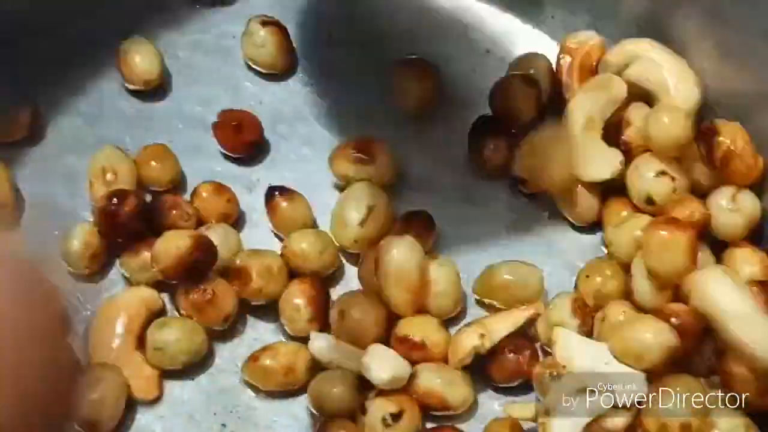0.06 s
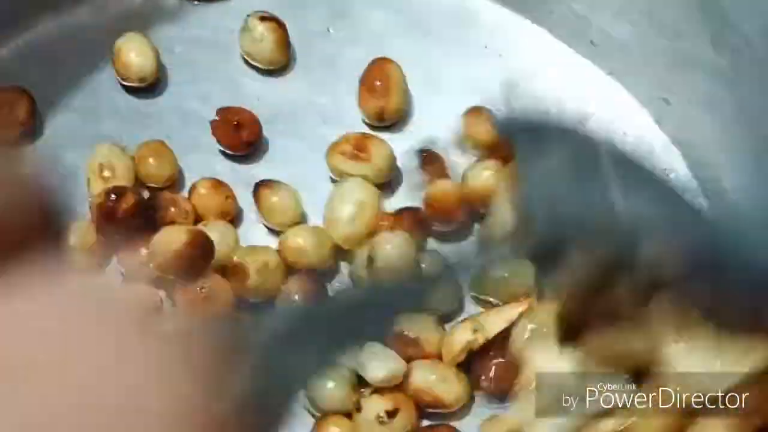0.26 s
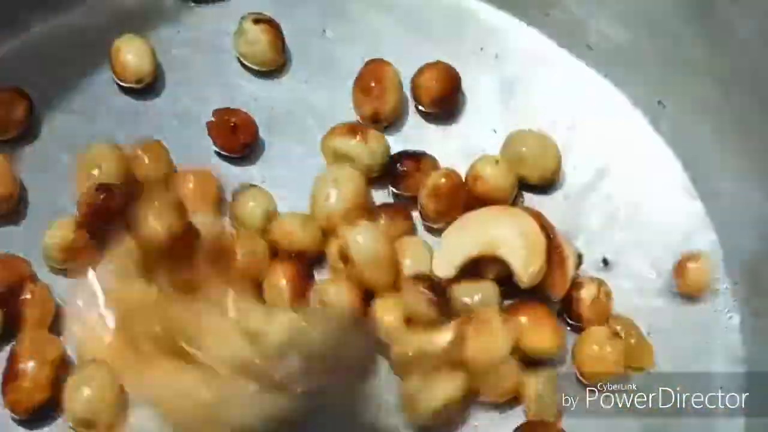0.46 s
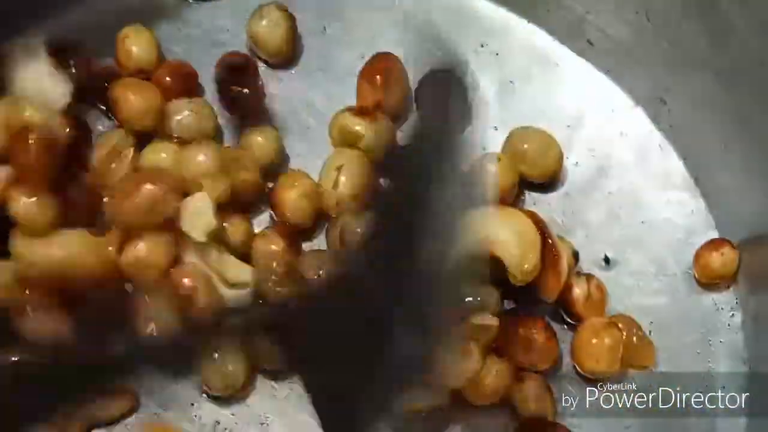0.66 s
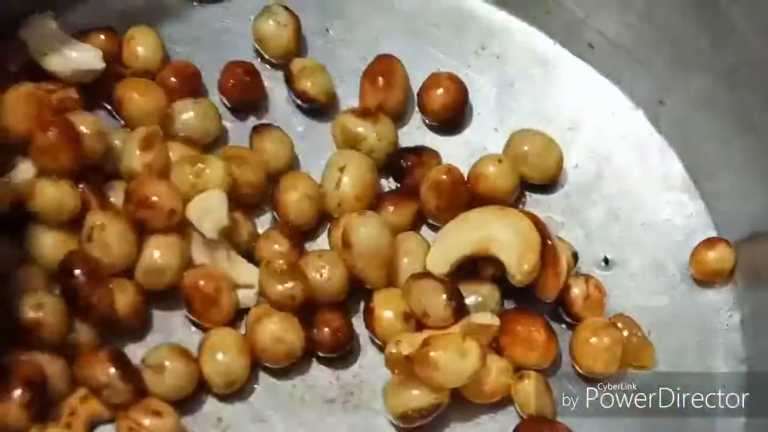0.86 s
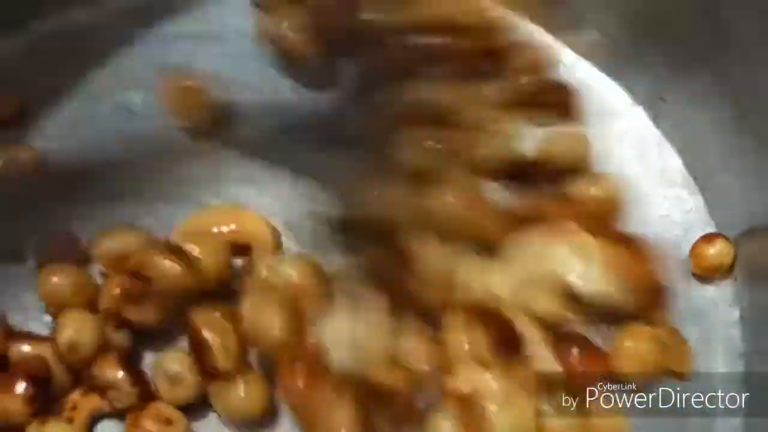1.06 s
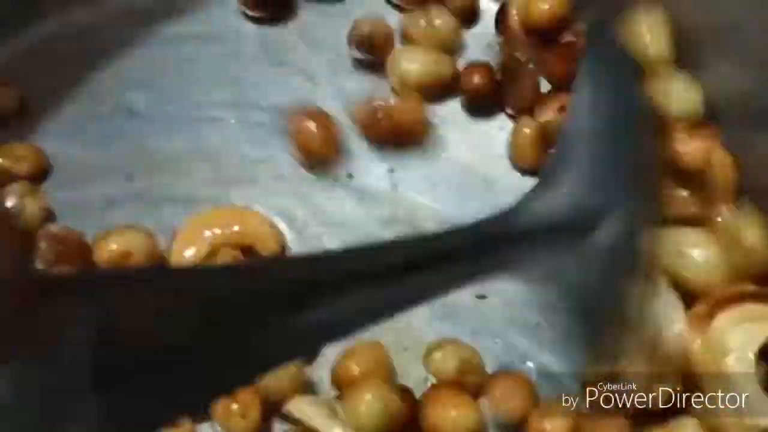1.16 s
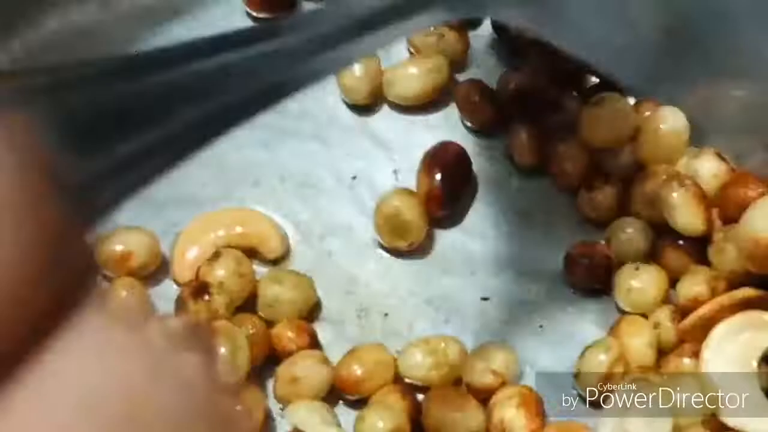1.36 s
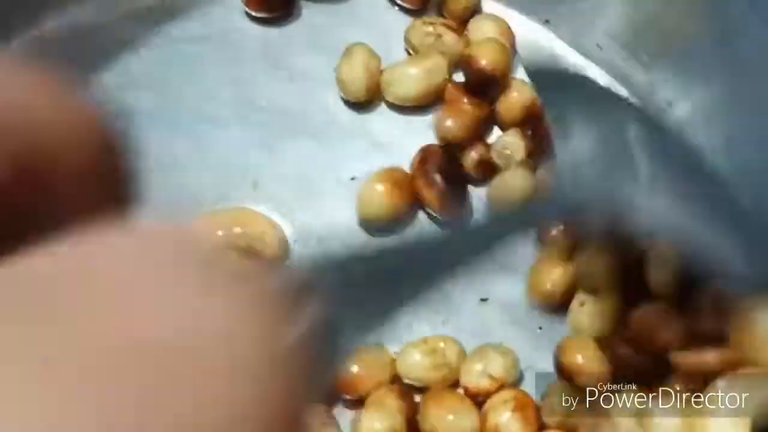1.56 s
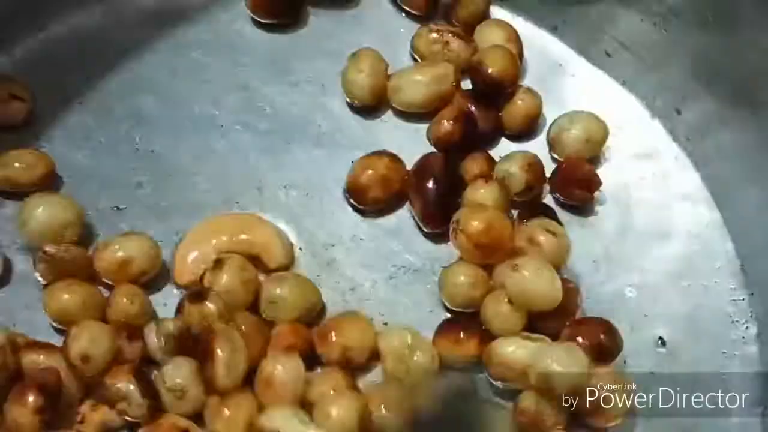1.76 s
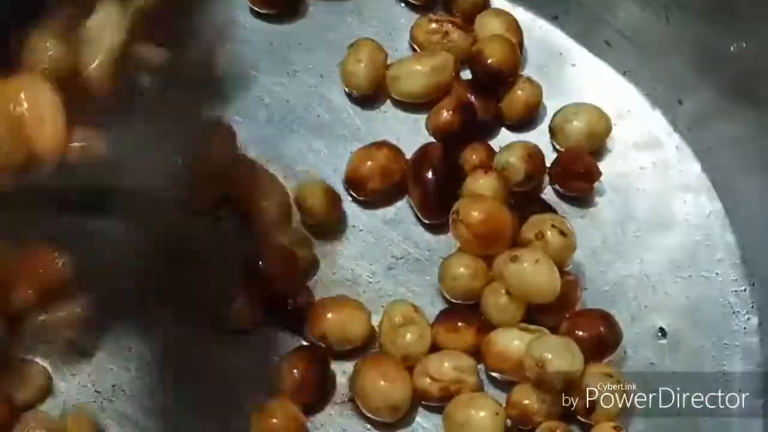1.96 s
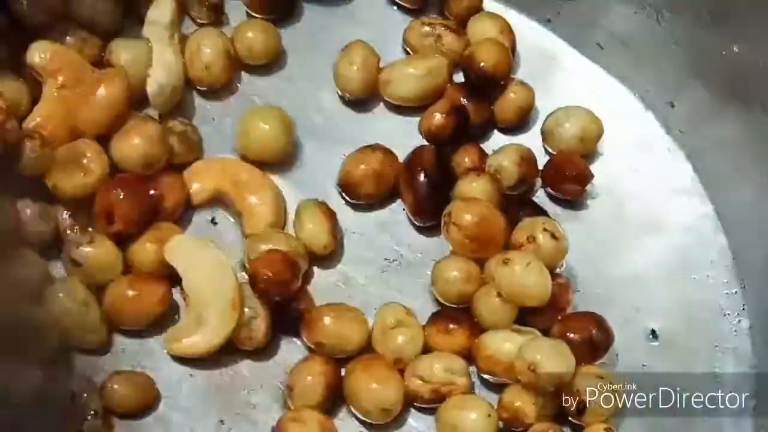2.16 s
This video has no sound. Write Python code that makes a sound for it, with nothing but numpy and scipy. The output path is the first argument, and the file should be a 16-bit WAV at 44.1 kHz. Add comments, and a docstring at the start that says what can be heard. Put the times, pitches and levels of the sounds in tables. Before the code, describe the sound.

A metal spoon stirs nuts in a steel pan, heard close and dry. After faint sizzle and low hum, a strong clank lands near 0.25-0.3 seconds, then knocks and a gritty scrape at 0.4-0.65. A shorter, brighter scrape up the wall comes at 1.1-1.27. Light taps at 1.6 lead to a third scrape with rattling knocks at 1.7-1.97, then a small last brush around 2.05.

```python
"""Three strokes of a metal spoon in a steel pan of nuts, close by: gritty scrapes, with knocks before or during them.
Each contact is a filtered noise burst plus decaying sine modes of spoon and pan, damped by hand and load.
Scrapes drive such responses with dense stick-slip impulses and nut ticks; single nuts add pitched hits.
Hot fat sizzles faintly as coloured random clicks, over a low stove rumble of coloured noise and a hum."""
import sys
import numpy as np
from scipy import signal
from scipy.fft import rfft, irfft
from scipy.io import wavfile
from scipy.ndimage import uniform_filter1d

SR = 44100
rng = np.random.default_rng(int(sys.argv[2]) if len(sys.argv) > 2 else 0)


def master_out(mix):
    """Clip the mix to full scale and print it as 16-bit PCM to the path in sys.argv[1]."""
    frames = np.transpose(np.atleast_2d(mix))
    ceiling = np.clip(frames, -1, 1)
    pcm = np.round(ceiling * 32767).astype(np.int16)
    wavfile.write(sys.argv[1], SR, pcm)


N = 97020
TIME = np.arange(N) / SR
RESPONSE_SIZE = 14400  # samples in the response to one contact
HIT_SPAN_S = 0.02  # opening of a hit over which its level is set
DRAGGED_SPOON_DB = -16.5  # ring of the spoon in scrapes and nut hits


def undb(db):
    """Amplitude gain is ten to the power of decibels over twenty."""
    return 10 ** (np.asarray(db) / 20)


def unit(x):
    """Energy normalisation: the squares sum to 1."""
    return x / np.sqrt(np.sum(x ** 2))


def level(x, db):
    """Root-mean-square normalisation of a full-length sound, in dB re 1."""
    return unit(x) * np.sqrt(N) * undb(db)


def decay(t, t60):
    """Exponential damping: the amplitude falls by 60 dB in t60 seconds."""
    return np.exp(-np.log(1000) * t / t60)


def colour(points, size=4096):
    """Minimum-phase filter taps for (Hz, dB) points, by folding the real cepstrum."""
    hz, db = np.array(sorted(points), float).T
    log_grid = np.log(np.fft.rfftfreq(size, 1 / SR) + 1)
    curve_db = np.interp(log_grid, np.log(hz), db)
    cepstrum = irfft(np.log(undb(curve_db)))
    cepstrum[1:size // 2] *= 2
    cepstrum[size // 2 + 1:] = 0
    return irfft(np.exp(rfft(cepstrum)))[:size // 2]


def shape(x, taps):
    """Linear filtering is convolution with an impulse response."""
    return signal.fftconvolve(x, taps)[:len(x)]


def bands(x):
    """Crossover filtering splits a sound into bass, middle, presence and treble."""
    # crossover frequencies: hz
    band_edges = [1100, 3000, 5000]
    parts = []
    for hz in band_edges:
        low = signal.butter(5, hz, "low", fs=SR, output="sos")
        high = signal.butter(5, hz, "high", fs=SR, output="sos")
        parts.append(signal.sosfilt(low, x))
        x = signal.sosfilt(high, x)
    return parts + [x]


def add(out, x, start_s):
    """Superposition: mix a sound in at a time."""
    i = int(start_s * SR)
    out[i:i + len(x)] += x[:N - i]


def clicks(per_s, scatter_db):
    """Random point process: impulses of uneven size and random sign, rms 1."""
    chance, size, sign = rng.random(N), rng.standard_normal(N), rng.choice([-1, 1], N)
    happens = chance < per_s / SR
    return level(happens * sign * undb(scatter_db * np.clip(size, -2, 2)), 0)


def stove():
    """Stationary noise through a fixed spectrum gives the rumble; one sine gives the hum."""
    # spectrum of the rumble: frequency_hz, density_db_per_hz
    stove_colour = [(50, -23.5), (75, -10.5), (120, 1), (148, -19), (190, -8), (370, -22), (2000, -27.5),
                    (6000, -48)]
    rumble_db, hum_hz, hum_db = -64, 92, -69
    rumble = shape(rng.standard_normal(N), colour(stove_colour))
    hum = np.sin(2 * np.pi * hum_hz * TIME)
    return level(rumble, rumble_db) + level(hum, hum_db)


def sizzle():
    """Countless tiny bubbles burst in the fat: a dense random pulse train fuses into coloured noise."""
    # spectrum of the frying fat: frequency_hz, density_db_per_hz
    fat_colour = [(500, -27.5), (1100, -9), (1500, -3.5), (2000, -10), (3500, 1.5), (4500, -4),
                  (5300, -14.5), (6400, -4.5), (7700, -17), (15500, -19)]
    pops_per_s, scatter_db, fat_db = 9000, 2, -68
    return level(shape(clicks(pops_per_s, scatter_db), colour(fat_colour)), fat_db)


def whiten(x, size=360):
    """Spectral whitening: divide out the broad humps of a noise burst."""
    spectrum = rfft(x, 2 * len(x))
    smooth_power = uniform_filter1d(np.abs(spectrum) ** 2, size)
    return irfft(spectrum / np.sqrt(smooth_power))[:len(x)]


def ring(modes, t):
    """Modal superposition: struck modes are damped sines with a short common rise, energy 1."""
    rise_s = 0.00041
    tones = 0
    for hz, t60, db in modes:
        tones = tones + rng.choice([-1, 1]) * undb(db) * np.sin(2 * np.pi * hz * t) * decay(t, t60)
    return unit(tones * (1 - np.exp(-t / rise_s)))


def clack(hz):
    """Local resonance: the very spot that is hit has a close pair of quickly damped modes."""
    t60_s, split = 0.034, 1.035  # split is the frequency ratio of the pair
    return ring([(hz, t60_s, 0), (hz / split, t60_s / 2, 0)], TIME[:RESPONSE_SIZE])


def contact(place, pan_db, spoon_db):
    """Impulse response: crowded modes as a noise burst with a duller tail, plus clear pan and spoon modes."""
    # clear modes of the pan: frequency_hz, t60_s, bottom_level_db, wall_level_db
    pan_modes = [(735, 0.21, -2, -24.5), (783.3, 0.15, -5, -6.5), (832.8, 0.14, 6, -34),
                 (884.5, 0.18, 1.5, -25), (1064, 0.27, -10, -8), (1350, 0.14, -24.5, -7),
                 (1425.5, .125, -0.5, -8), (1604, 0.11, -13.5, 3.5), (2116, 0.09, -8, 3.5),
                 (2331, 0.13, -14, -2), (2637, 0.12, -15.5, 0), (3185, 0.24, -10, -11.5),
                 (3780, .09, -4, -4.5), (4055, 0.19, -16, -1)]
    # clear modes of the spoon: frequency_hz, t60_s, level_db
    spoon_modes = [(1572, 0.16, -3), (2690, 0.12, 0.5), (3887, 0.026, 9.5), (4148, 0.078, 6),
                   (5080, 0.11, -12), (6120, 0.05, -9), (7000, .06, -11)]
    # crowded, quickly damped modes at the bottom of the pan: frequency_hz, density_db_per_hz
    bottom_colour = [(40, -37.5), (90, -15), (145, -21.5), (290, -8.5), (400, -16), (480, -9.5),
                     (650, -8.5), (850, -1), (1000, -19.5), (1170, -16.5), (1450, -3), (1770, -20),
                     (2200, -9), (2450, -15), (3000, -12.5), (4050, -9.5), (4500, -20), (5000, -17),
                     (5600, -27), (6150, -16.5), (6950, -22), (7450, -31.5), (8250, -26), (9800, -34.5),
                     (15000, -39.5)]
    # crowded, quickly damped modes towards the wall: frequency_hz, density_db_per_hz
    wall_colour = [(40, -31), (150, -12), (500, -12.5), (780, -6.5), (1200, -9), (1420, 7), (1590, 6.5),
                   (1750, -17.5), (2300, -6), (2850, -7.5), (3200, -3), (3850, -6), (4400, -21),
                   (5050, -12), (5600, -26.5), (6650, -17), (7350, -34.5), (8250, -22.5), (8900, -33.5),
                   (15000, -33)]
    rise_s, burst_decay_s = 0.002, 0.0044  # time constants
    tail_db, tail_t60_s, tail_damp_hz = -12, 0.13, 5800

    t, wall = TIME[:RESPONSE_SIZE], np.clip(place, 0, 1)
    burst, tail = rng.standard_normal((2, RESPONSE_SIZE))
    burst = burst * np.exp(-t / burst_decay_s)
    pole = np.exp(-2 * np.pi * tail_damp_hz / SR)
    tail = signal.lfilter([1 - pole], [1, -pole], tail) * decay(t, tail_t60_s)
    crowd = whiten((burst + undb(tail_db) * tail) * (1 - np.exp(-t / rise_s)))

    # place runs from the bottom (0) to the wall (1)
    body = (1 - wall) * colour(bottom_colour) + wall * colour(wall_colour)
    modes = [(hz, t60, (1 - wall) * bottom_db + wall * wall_db) for hz, t60, bottom_db, wall_db in pan_modes]
    return unit(shape(crowd, body)) + undb(pan_db) * ring(modes, t) + undb(spoon_db) * ring(spoon_modes, t)


def nut_hits():
    """Impact excitation: single nuts are flung against the steel, each with its own pitch."""
    # nuts landing: start_s, level_db, pitch_hz
    nut_table = [(0.43, -33.5, 4000), (0.518, -34.5, 810), (0.581, -29, 838), (0.668, -44.5, 1316),
                 (0.708, -50.5, 886), (0.902, -61, 5990), (1.116, -53.5, 3670), (1.222, -31, 3430),
                 (1.84, -25.5, 4220), (1.868, -37, 1410), (1.912, -40, 2260), (2.072, -44.5, 4120)]
    clack_db, pan_db = -1, -3
    out, span = np.zeros(N), int(HIT_SPAN_S * SR)
    for start_s, db, hz in nut_table:
        hit = contact(0, pan_db, DRAGGED_SPOON_DB) + undb(clack_db) * clack(hz)
        add(out, undb(db) * hit / np.std(hit[:span]), start_s)
    return out


def sway(x):
    """Time-varying resonance: the pan's main mode shifts as spoon and load move over the bottom."""
    # path of the main resonance: time_s, frequency_hz
    resonance_path = [(0.47, 720), (0.56, 970), (0.68, 835), (1.7, 762), (1.83, 740), (1.875, 880)]
    width_hz, lift_db = 65, -3
    path_hz = np.interp(TIME, *np.array(resonance_path).T)
    turn = np.exp(2j * np.pi * np.cumsum(path_hz) / SR)
    pole = np.exp(-np.pi * width_hz / SR)
    # shift the resonance to 0 Hz, smooth there, shift back
    resonant = turn * signal.lfilter([1 - pole], [1, -pole], x / turn)
    return x + undb(lift_db) * 2 * np.real(resonant)


def scrape(stroke, place, count=6):
    """Stick-slip friction: slips and ticks of pushed nuts excite spots that each ring a little differently."""
    slips_per_s, slip_scatter_db = 1200, 4.5
    nut_ticks_per_s, nut_scatter_db, nut_db = 110, 2.5, 1  # nut level relative to the slips
    pan_db, spot_s, even_span_s = -10.5, 0.031, 0.03
    out = np.zeros(N)
    times, *band_db = np.array(stroke).T
    touching = (TIME > times[0]) & (TIME < times[-1])
    t, forces = TIME[touching], []
    nuts = undb(nut_db) * clicks(nut_ticks_per_s, nut_scatter_db)
    for db in band_db:  # nuts tick in all bands at once; each band has its own fine slips
        hits = nuts + clicks(slips_per_s, slip_scatter_db)
        # even out the local click energy, so loudness follows the stroke's curve
        local_rms = np.sqrt(uniform_filter1d(hits ** 2, int(even_span_s * SR)))
        hits = hits / local_rms
        forces.append(hits[touching] * undb(np.interp(t, times, db)))
    for spot in range(count):  # the spoon travels round the spots in turn
        here = (t // spot_s) % count == spot
        responses = bands(contact(place, pan_db, DRAGGED_SPOON_DB))
        for force, response in zip(forces, responses):
            add(out, signal.fftconvolve(here * force, unit(response)), times[0])
    return out


def knocks():
    """Impact spectrum depends on the spot: bright with the spoon's edge, dull with its bowl; light spoon, little bass."""
    # knocks on the pan: start_s, bass_db, middle_db, presence_db, treble_db, pan_ring_db, spoon_ring_db,
    # place (0 bottom - 1 wall), clack_hz, clack_db
    knock_table = [(0.243, -39, -44.5, -29, -32, 2, -10, 0.74, 3720, -2.5),
                   (0.2807, -15.5, -23.5, -27, -35.5, -5, -9, 0, 3484, -5),
                   (0.4221, -39.5, -73, -33.5, -41, -15, 10, 1, 6880, 8),
                   (0.504, -25.5, -34.5, -21.5, -26, -2, -4, 0.1, 4155, -2),
                   (0.541, -26, -29.5, -35.5, -41, 1.5, -17, 0, 1393, 1),
                   (0.562, -32, -28, -58, -36.5, 9, 0, 0, 2850, -4),
                   (1.0104, -42.5, -42, -42.5, -54.5, 7.5, -1, 1, 2640, -12),
                   (1.162, -63, -33, -36.5, -46.5, -3, -27, 0.53, 3820, -5),
                   (1.251, -32.5, -48.5, -53, -58, -6.5, -19, 0.5, 1036, -1),
                   (1.575, -51.5, -36.5, -39, -42.5, -17, 11.5, 0.39, 2693, 3),
                   (1.6407, -32, -35.5, -43.5, -74, -5.5, -14, 0.07, 685, -3.5),
                   (1.8266, -29, -49, -32, -40, 5, 6, 0.24, 750, 3),
                   (1.89, -26.5, -34.5, -39, -48, 12, 13, 0.13, 2215, 12)]
    low_cut_hz = 284
    out, span = np.zeros(N), int(HIT_SPAN_S * SR)
    light = signal.butter(3, low_cut_hz, "high", fs=SR, output="sos")
    for start_s, *band_db, pan_db, spoon_db, place, clack_hz, clack_db in knock_table:
        blow = contact(place, pan_db, spoon_db) + undb(clack_db) * clack(clack_hz)
        parts = bands(signal.sosfilt(light, blow))
        knock = sum(undb(db) * part / np.std(part[:span]) for db, part in zip(band_db, parts))
        add(out, knock, start_s)
    return out


def scene():
    """Superposition of spoon, nuts and pan over fat and stove; the second stroke runs up the wall."""
    # spoon dragged over the steel, one list a stroke: time_s, bass_db, middle_db, presence_db, treble_db
    stroke_tables = [
        [(0.334, -29.5, -39.5, -43.5, -52.5), (0.375, -49, -43, -46.5, -45), (0.405, -57, -46.5, -51, -57),
         (0.432, -42, -33, -36, -36), (0.485, -39, -40.5, -42, -49.5), (0.54, -29, -29.5, -30, -45.5),
         (0.612, -37.5, -34, -45, -44.5), (0.64, -53, -90, -61, -63), (0.73, -59.5, -69, -61, -61.5),
         (0.77, -84.5, -79, -81.5, -80)],
        [(0.965, -62, -77, -79, -70.5), (1.105, -55.5, -54, -58, -60), (1.122, -50, -43.5, -44.5, -56.5),
         (1.17, -40, -28.5, -38, -41.5), (1.21, -43, -25, -33, -40.5), (1.252, -41, -29.5, -34.5, -36.5),
         (1.27, -41, -60, -90, -77), (1.30, -54.5, -78, -57, -61), (1.36, -79.5, -75.5, -66, -80)],
        [(1.59, -52.5, -59, -45, -54), (1.665, -48, -51, -72, -64.5), (1.695, -42, -35.5, -65, -58),
         (1.755, -48.5, -34, -46, -43.5), (1.815, -32.5, -33, -34.5, -40.5), (1.868, -28, -28, -31, -43),
         (1.95, -35, -34.5, -37, -41), (1.976, -42, -41, -69, -76), (2.01, -69, -67, -76, -58),
         (2.05, -45.5, -44, -45, -65), (2.1, -59.5, -58.5, -58, -61.5), (2.14, -80, -83, -62.5, -80)],
    ]
    places = (0, 1, 0)  # bottom, wall, bottom
    stirring = sum(scrape(stroke, place) for stroke, place in zip(stroke_tables, places))
    return (knocks() + nut_hits() + sway(stirring) + sizzle() + stove())[None]


def record(dry):
    """Band limiting: a high-pass thins the deep bass and a steep low-pass cuts the top."""
    low_cut_hz, top_hz = 38, 15700
    thin = signal.sosfilt(signal.butter(3, low_cut_hz, "high", fs=SR, output="sos"), dry)
    return signal.sosfilt(signal.ellip(10, 0.2, 80, top_hz, fs=SR, output="sos"), thin)


dry = scene()
out = record(dry)
master_out(out)
```